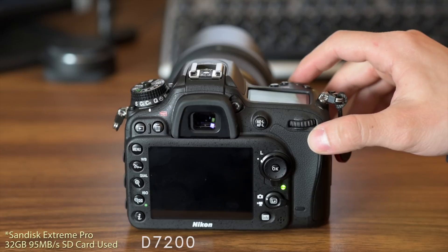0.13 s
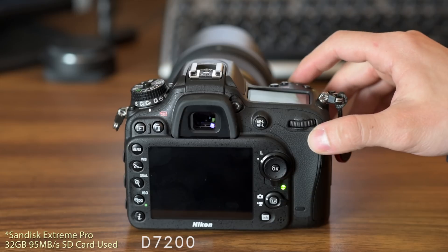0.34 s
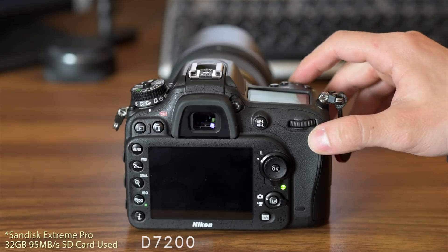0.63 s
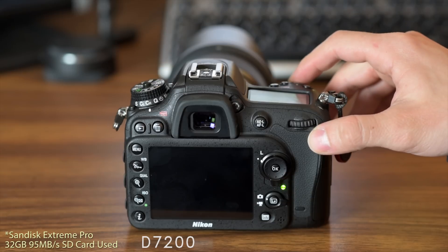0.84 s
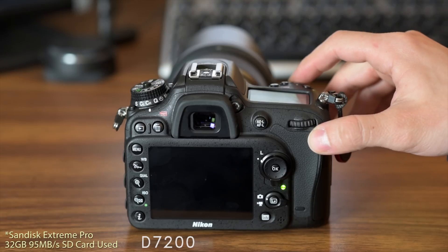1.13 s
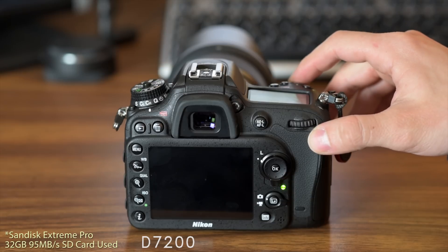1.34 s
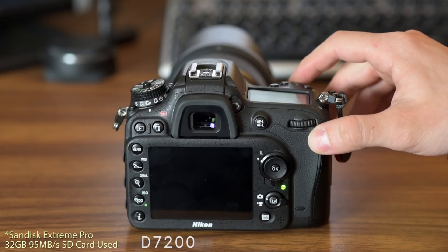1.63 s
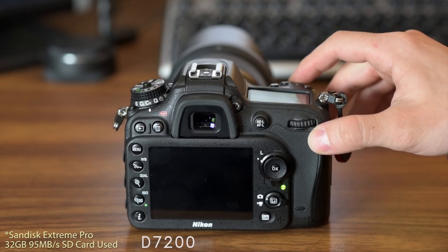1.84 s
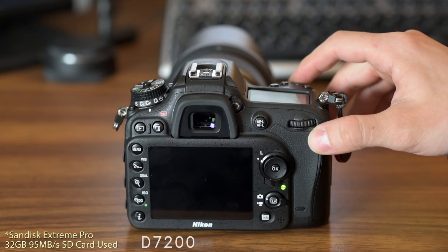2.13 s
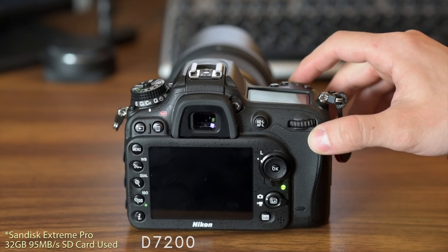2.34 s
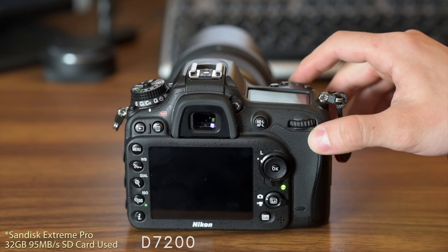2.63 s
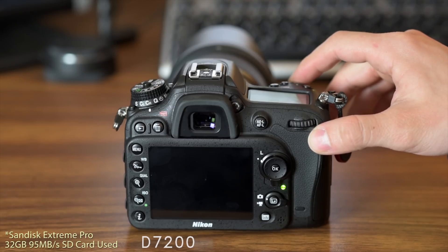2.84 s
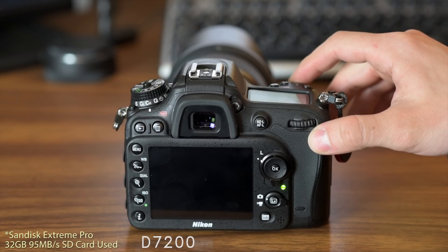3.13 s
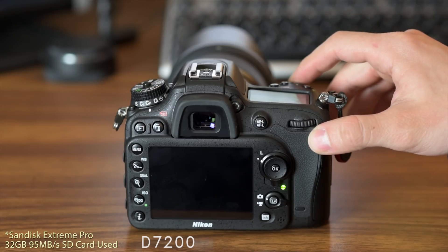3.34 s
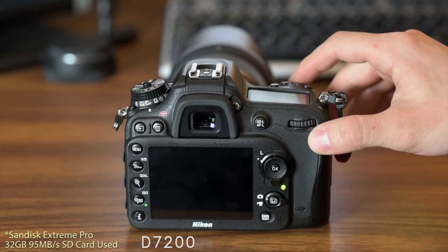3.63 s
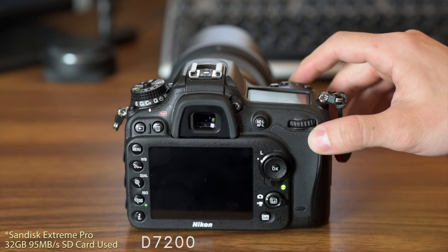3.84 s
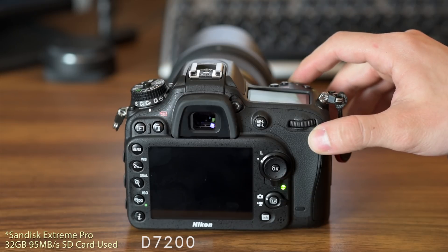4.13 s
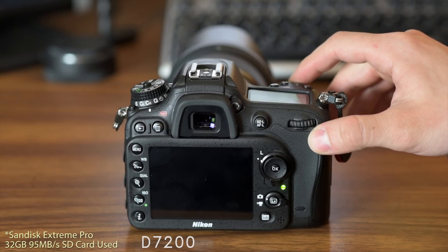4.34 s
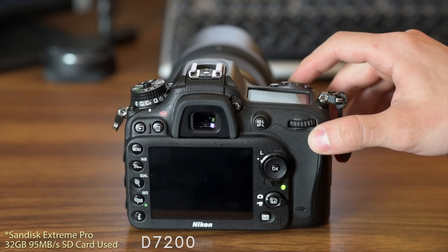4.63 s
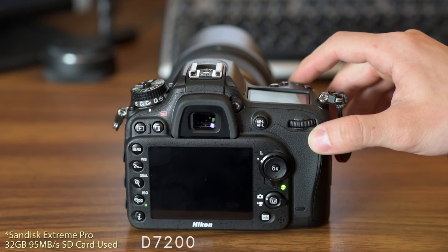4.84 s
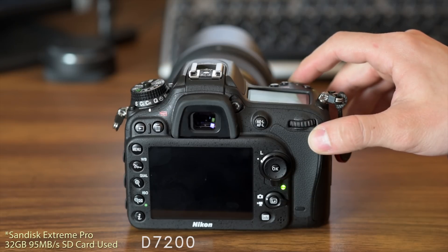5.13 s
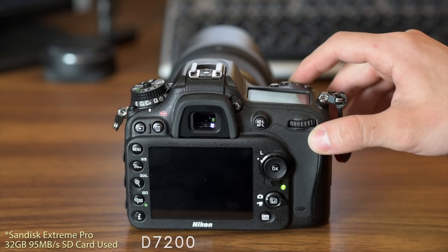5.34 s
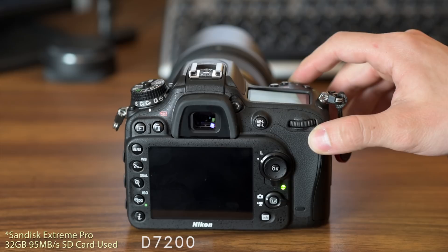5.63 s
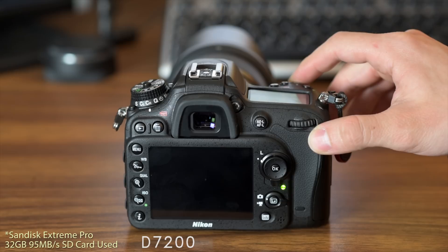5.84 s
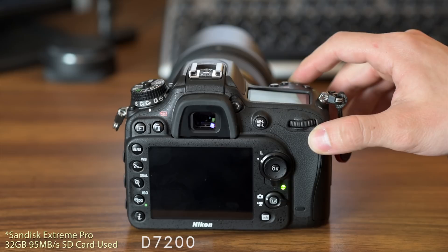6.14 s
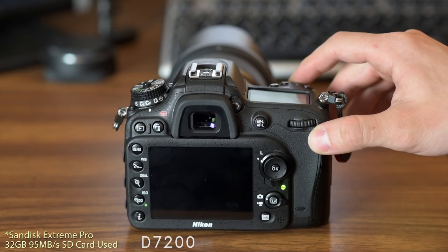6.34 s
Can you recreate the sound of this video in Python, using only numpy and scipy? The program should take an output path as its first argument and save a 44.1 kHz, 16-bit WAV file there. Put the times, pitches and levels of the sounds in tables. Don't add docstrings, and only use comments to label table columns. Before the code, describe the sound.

A quiet room with very faint low air and hiss, a close microphone, and a reflex camera standing on a wooden desk. From 0.03 s it fires a steady burst, one shot every 0.16 s, until about 4.4 s. Each shot lasts roughly a tenth of a second: a light latch tick, a mirror slap near 30 ms, a hard bright shutter clack near 50 ms, grainy gear winding, a strong mirror-return clack near 86 ms and a small catch click. Clack strength varies slightly from shot to shot. Plates ring briefly, the desk gives short dull thumps, and thin springs whine faintly. Then single shots come unevenly at about 4.75, 4.96, 5.26, 5.47, 5.68, 5.99, 6.29 and 6.45 s. After longer waits, a faint motor stir precedes the shot. The gaps hold fading spring whine and soft hiss; echo is short and weak.

```python
import sys
import numpy as np
from scipy import signal
from scipy.fft import rfft, irfft
from scipy.io import wavfile
from scipy.ndimage import uniform_filter1d

SR = 44100
rng = np.random.default_rng(int(sys.argv[2]) if len(sys.argv) > 2 else 0)


def bounce(signal):
    frames = np.transpose(np.atleast_2d(signal))
    limited = np.clip(frames, -1, 1)
    pcm = np.round(limited * 32767).astype(np.int16)
    wavfile.write(sys.argv[1], SR, pcm)


def invert_db(x):
    u = np.asarray(x, float) / 20
    return 10 ** u


N = 286650

# f/Hz, level/dB
AIR_COLOUR = [(40, -33.5), (80, -12.5), (130, 8), (250, 2), (500, -11.5), (1000, -19.5), (2500, -23.5),
              (5000, -32.5), (11000, -45), (13000, -64)]
# f/Hz, t60/s
ROOM_DECAY = [(300, 0.34), (1500, 0.19), (4000, .16), (12000, 0.15)]
# f/Hz, level/dB, t60/s, polarity
DESK_MODES = [(99.2, -7, 0.22, -0.99), (131.2, -14, 0.32, 1), (158, -4, 0.09, 0.95),
              (168.5, -14.5, 0.64, 0.61), (228.2, 0.5, 0.056, -0.9), (225.5, -24.5, 0.63, -1.25),
              (284.4, -4, 0.044, 0.96), (307, -22, 0.27, 0.99), (348.3, -25.5, 0.28, 0.56)]

# f/Hz, level/dB
LATCH_COLOUR = [(240, -47), (400, -27), (964, -6.5), (2400, -6), (3070, 4), (4950, -10), (7170, -1),
                (8240, -20.5), (9610, -11.5), (16000, -26)]
LEVER_COLOUR = [(240, -48), (400, -24.5), (839, -6), (1840, -7.5), (3070, 5), (3870, -6), (5270, -9),
                (6540, -13), (8900, -9.5), (9610, -10), (16000, -39)]
MIRROR_COLOUR = [(240, -42), (400, -8.5), (742, -16), (1380, -2), (2320, -12.5), (2900, -3), (4200, -10),
                 (5030, -6.5), (7060, -14.5), (8900, -14), (10700, -17), (16000, -30)]
CURTAIN_COLOUR = [(240, -13.5), (400, -10), (900, -9.5), (1400, 2), (2220, 0.5), (3160, -1), (5430, 0),
                  (6340, -6), (6950, -3), (7400, -12), (10500, -8.5), (16000, -25)]
RETURN_COLOUR = [(240, -47.5), (400, -19), (528, -16), (777, -11), (1200, -12.5), (2250, -3), (2510, -8),
                 (2970, 5.5), (3260, -5), (3530, -3), (10500, -16), (16000, -25)]
CATCH_COLOUR = [(240, -51), (400, -5), (579, -6.5), (1180, 8), (2180, 3), (2710, -5), (3260, 4.5),
                (4650, -13.5), (5780, -7), (16000, -35.5)]
GEAR_COLOUR = [(240, -29.5), (400, -10), (528, -12.5), (1600, -7.5), (1870, -2), (2430, -8), (3120, -0.5),
               (4880, -9), (6440, -9.5), (8500, -19), (13300, -26), (15300, -28), (16000, -57.5)]
WAKE_COLOUR = [(240, -48), (400, -33), (545, -7.5), (1250, -15), (1380, -4), (1760, -10), (3470, -3.5),
               (4730, -11), (8900, -18), (16000, -37)]

# t/ms into the frame, level/dB, direction
SWING_JOLTS = [
    (12.17, -35.5, 0.84),
    (23.18, -45, 0.82),
]
MIRROR_JOLTS = [
    (26.773, -29.5, 0.99),
    (33.39, -33.5, 0.74),
]
CURTAIN_JOLTS = [
    (47.34, -28, -1.15),
]
WIND_JOLTS = [
    (63.39, -33.5, 0.9),
    (72.66, -36, -0.92),
    (81.78, -33, -1.09),
    (88.2, -36, -0.65),
    (99.2, -44.5, 0.89),
]

# t/ms into the frame, f/Hz, peak level/dB, t60/ms
MIRROR_KNOCKS = [
    (29.02, 3410, -15, 8.7),
    (29.7, 3770, -18, 11.8),
    (29.4, 1310, -28, 31.5),
]
CURTAIN_KNOCKS = [
    (50.8, 1310, -22, 25.7),
    (51.37, 886, -36.5, 43),
    (51.4, 587, -43.5, 53),
]
RETURN_KNOCKS = [
    (86, 818, -28, 25.3),
    (86.8, 2210, -25.5, 30),
    (87.7, 1700, -34, 26),
    (100.63, 1030, -36, 25),
]

# t/ms at start, full, let go and stop, level/dB
WINDING = [
    (0, 2.5, 34.3, 59, -41),
    (30, 44, 45, 75, -41.5),
    (47, 62.2, 75.4, 98, -35),
    (75.5, 84, 93, 110, -42),
    (95, 94, 108, 120, -57.5),
]
WAKING = [
    (-47, -43.5, -28, -16, -52),
    (-30, -25, -15.5, 0, -59),
    (-8, -2, 3, 7, -55),
    (1, 0.5, 0, 7, -49),
]

# t/ms into the frame, peak level/dB, rise/ms, t60/ms, extra treble/dB
LATCH_BLOWS = [
    (-3, -47.5, 1, 74, -19),
    (0, -26.5, 0.41, 9.5, 2),
    (1.44, -27.5, 0.56, 12, -2.5),
]
LEVER_BLOWS = [
    (5.8, -29.5, 0.42, 18, 1),
    (6.6, -34.5, 0.23, 12, 11.5),
    (8.0, -29.5, 0.84, 16, -6.5),
    (10.3, -33, 0.4, 25, -7.5),
]
MIRROR_BLOWS = [
    (26.65, -31.5, 1, 21.6, 4.5),
    (29.08, -31, 0.34, 14, -1.5),
    (30.4, -28, 0.44, 23, -1.5),
]
CURTAIN_BLOWS = [
    (49.78, -20.5, .4, 9, 6.5),
    (51.66, -21.5, 0.42, 15.4, -2.5),
    (52.26, -21.5, 0.69, 12.6, -4.5),
]
CAM_BLOWS = [
    (44.3, -40.5, 0.56, 14, 3.5),
    (58.35, -37.5, 0.75, 18, 8.5),
    (71.1, -29.5, 0.95, 11, -1),
    (71.3, -34.5, .4, 26, 9),
    (83.5, -32.5, 0.91, 9.3, 7),
]
RETURN_BLOWS = [
    (84.3, -23.5, 0.2, 8.6, 7),
    (86.56, -22, 0.17, 15, -2),
    (88.5, -22, 0.84, 13.9, 5.5),
    (90.4, -27.5, 0.27, 25, -5.5),
]
CATCH_BLOWS = [
    (100.15, -33.5, 0.21, 39.6, 11.5),
    (103.8, -41, 1, 51, -8.5),
]

# t/s, mirror shift/ms, curtain level/dB, first spring level/dB
BURST = [(0.0296, -0.21, -7.5, -72), (0.1928, 0.37, -0.6, -63), (0.3562, -0.45, -9, -72),
         (0.5201, -0.42, -9, -74), (0.6832, -0.18, -7, -70), (0.8471, 0.051, -10, -79),
         (1.0104, 0.42, -0.2, -80), (1.1739, 0.54, -2.5, -82), (1.3373, 0.84, -9.5, -76),
         (1.501, 1, -0.3, -76), (1.6643, 0.79, -8, -75), (1.8276, 0.43, -10, -78),
         (1.9914, -0.75, -0.9, -82), (2.1551, -0.35, -9, -70), (2.3185, -0.25, -6.5, -81),
         (2.4817, -0.43, -0.6, -71.5), (2.6456, -0.36, -7.5, -81), (2.8088, -0.6, -4.5, -74),
         (2.9721, -0.22, -2, -77), (3.1359, -0.62, -7, -67), (3.2993, -0.51, -0.5, -71),
         (3.4635, -0.016, -10.5, -72), (3.627, 0.0044, -7.5, -75), (3.7902, 0.35, -0.5, -67.5),
         (3.9542, 0.1, -9, -67.5), (4.1177, 0.15, -0.5, -62.5), (4.281, 0.27, -8, -83)]
# t/s, mirror shift/ms, curtain level/dB, first spring level/dB, second spring level/dB
UNEVEN = [
    (4.4442, 0.07, -10, -68, -76),
    (4.7479, 0.1, -11, -65, -100),
    (4.9591, -0.67, -0.6, -79, -74),
    (5.263, -0.15, -9, -80, -77),
    (5.4726, -0.37, -8, -74, -76),
    (5.6832, -0.35, -0.9, -79, -70),
    (5.9876, -0.52, -9.5, -67, -70.5),
    (6.2908, 0.083, -14, -75, -79.5),
    (6.4505, 0.43, -3, -80, -72),
]
SHOTS = np.array([row[:4] for row in BURST + UNEVEN])
MIRROR_DB = 1.33


def read(points, hz):
    f, value = np.transpose(points)
    return np.interp(np.log(hz + 1), np.log(f + 1), value)


def colour(x, spectrum):
    hz = abs(np.fft.fftfreq(4096, 1 / SR))
    gain = np.log(invert_db(np.maximum(read(spectrum, hz), -90)))
    phase = -signal.hilbert(gain).imag
    taps = np.fft.ifft(np.exp(gain + 1j * phase)).real[:1024]
    return signal.oaconvolve(x, taps / np.linalg.norm(taps))[:len(x)]


def add(mix, s, sound):
    at = round(s * SR)
    sound = sound[max(-at, 0):]
    part = mix[max(at, 0):][:len(sound)]
    part += sound[:len(part)]


def background():
    return invert_db(-61) * colour(rng.standard_normal(N), AIR_COLOUR)


def room(x):
    taps = np.zeros(SR // 2)
    at = np.arange(200, SR // 2 - 20, 20)
    taps[at + rng.integers(0, 20, len(at))] = rng.choice([-1., 1.], len(at))
    hz, t, z = signal.stft(taps, SR, nperseg=256)
    decay = invert_db(-60 * t / read(ROOM_DECAY, hz)[:, None])
    tail = signal.istft(z * decay, SR, nperseg=256)[1]
    return signal.oaconvolve(x, tail / np.linalg.norm(tail))[:N]


def desk():
    lead_s = 0.5
    earlier = (SHOTS[0, 0] * 2 - SHOTS[1, 0], 0, 0, 0)
    s, shift_ms, curtain_db, _ = np.vstack([earlier, SHOTS]).T
    force = np.zeros(N + SR)
    sources = ((SWING_JOLTS + WIND_JOLTS, s, 0 * s),
               (CURTAIN_JOLTS, s, curtain_db),
               (MIRROR_JOLTS, s + shift_ms / 1000, MIRROR_DB + 0 * s))
    for jolts, starts, gains_db in sources:
        for at_ms, db, way in jolts:
            at = np.round((starts + lead_s + at_ms / 1000) * SR).astype(int)
            np.add.at(force, at, way * invert_db(db + gains_db))
    t = np.arange(SR // 2) / SR
    ring = np.zeros(len(t))
    for hz, db, t60, way in DESK_MODES:
        ring += way * invert_db(db - 60 * t / t60) * np.sin(2 * np.pi * hz * t)
    wood = signal.oaconvolve(force, ring)
    for _ in range(2):
        wood = signal.lfilter(*signal.butter(1, 150, "high", fs=SR), wood)
    return wood[SR // 2:][:N]


def springs():
    whine_hz, t60 = (2148, 2030, 1863), 0.33
    t, starts = np.arange(N) / SR, SHOTS[:, 0] + 0.1
    weak_db = (-80, -82.5) + 2 * rng.standard_normal((len(SHOTS), 2))
    weak_db[len(BURST):, 0] = [row[-1] for row in UNEVEN]
    whine_db = np.c_[SHOTS[:, -1], weak_db]
    frame = np.maximum(np.searchsorted(starts, t) - 1, 0)
    age = ((t - starts[frame]) % 1)[:, None]
    level = invert_db(whine_db[frame] - 60 * (age - 0.04) / t60) * np.minimum(age / 0.01, 1)
    level = uniform_filter1d(level, size=200, axis=0)
    return np.sqrt(2) * (level * np.sin(2 * np.pi * np.outer(t, whine_hz))).sum(1)


def rattle(strokes, spectrum, starts, teeth_per_s, spread_db):
    edge_db = -18
    ms = np.arange(-50, 120, 1000 / SR)
    power = np.zeros(len(ms))
    for *corners, db in strokes:
        swell_db = np.interp(ms, np.sort(corners), [edge_db, 0, 0, edge_db], -99, -99)
        power += invert_db(db + swell_db) ** 2
    level = np.zeros(N)
    for s in starts:
        add(level, s + ms[0] / 1000, np.sqrt(power))
    is_tooth = rng.random(N) < teeth_per_s / SR
    size_db = np.minimum(rng.exponential(1, N), 4) * spread_db
    teeth = is_tooth * invert_db(size_db) * rng.standard_normal(N)
    return colour(level * teeth / np.std(teeth), spectrum)


def knocks(plates, starts, gains_db):
    ms, out = np.arange(2500) / SR * 1000, np.zeros(N)
    for at_ms, hz, db, t60_ms in plates:
        swell = np.sin(np.pi / 2 * np.minimum(ms / 1.3, 1)) ** 2
        shape = invert_db(db - 60 * ms / t60_ms) * swell
        drifts = rng.normal(1, 0.018, len(starts))
        for s, gain_db, drift in zip(starts, gains_db, drifts):
            tone = np.sin(2 * np.pi * hz * drift * ms / 1000)
            add(out, s + at_ms / 1000, invert_db(gain_db) * shape * tone)
    return out


def strikes(blows, spectrum, starts, gains_db, alike):
    tick = 2.88
    ms, body, treble = np.arange(2000) / SR * 1000, np.zeros(N), np.zeros(N)
    for at_ms, db, rise_ms, t60_ms, treble_db in blows:
        shape = invert_db(db - 60 * ms / t60_ms) * np.minimum(ms / rise_ms, 1)
        habit = rfft(rng.standard_normal(len(ms)) * shape)
        even = np.sqrt(uniform_filter1d(abs(habit) ** 2, size=11))
        habit = irfft(habit / even) * np.linalg.norm(shape) * (ms < 30)
        habit[round(rise_ms * SR / 1000)] += tick * shape.max()
        fresh = rng.standard_normal((len(starts), len(ms))) * shape
        for s, gain_db, chance in zip(starts, gains_db, fresh):
            blow = invert_db(gain_db) * (alike * habit + np.sqrt(1 - alike ** 2) * chance)
            add(body, s + at_ms / 1000, blow)
            add(treble, s + at_ms / 1000, blow * invert_db(treble_db - 2.83 * ms))
    low = signal.butter(2, 6500, "low", fs=SR, output="sos")
    high = signal.butter(2, 6500, "high", fs=SR, output="sos")
    return colour(signal.sosfilt(low, body) - signal.sosfilt(high, treble), spectrum)


def camera():
    loose, firm = 0.75, 0.9
    s, shift_ms, curtain_db, _ = SHOTS.T
    woken = np.diff(s, prepend=0) > 0.25
    luck = rng.standard_normal((len(s), 2))
    mirror_db = MIRROR_DB + 0.5 * luck[:, 0]
    return_db = -2.13 - 0.27 * luck[:, 1]
    trip = s + woken * 3.6 / 1000
    slap, even = s + shift_ms / 1000, 0 * s
    return (strikes(LATCH_BLOWS, LATCH_COLOUR, trip, -3 * woken, loose)
            + strikes(LEVER_BLOWS, LEVER_COLOUR, trip, -3 * woken, loose)
            + strikes(MIRROR_BLOWS, MIRROR_COLOUR, slap, mirror_db, firm)
            + strikes(CURTAIN_BLOWS, CURTAIN_COLOUR, s, 1.1 * curtain_db, firm)
            + strikes(CAM_BLOWS, GEAR_COLOUR, s, even, loose)
            + strikes(RETURN_BLOWS, RETURN_COLOUR, s, return_db, firm)
            + strikes(CATCH_BLOWS, CATCH_COLOUR, s, even, firm)
            + knocks(MIRROR_KNOCKS, slap, mirror_db)
            + knocks(CURTAIN_KNOCKS, s, 0.75 * curtain_db)
            + knocks(RETURN_KNOCKS, s, return_db)
            + rattle(WINDING, GEAR_COLOUR, s, 6000, 2.5)
            + rattle(WAKING, WAKE_COLOUR, s[woken], 12000, 1.4))


def scene():
    body = signal.sosfilt(signal.butter(2, 430, "high", fs=SR, output="sos"), camera())
    heard = body + invert_db(-19.5) * room(body) + springs()
    frame = round((SHOTS[1, 0] - SHOTS[0, 0]) * SR)
    quiet = round(SHOTS[0, 0] * 0.85 * SR)
    fade = np.hanning(2 * quiet)[quiet:] ** 0.25
    add(heard, 0, heard[frame:frame + quiet] * fade)
    return (heard + desk() + background())[None]


def band_limit(x):
    return signal.sosfilt(signal.butter(12, 16800, fs=SR, output="sos"), x)


def record(dry):
    x = signal.sosfilt(signal.butter(3, 60, "high", fs=SR, output="sos"), dry)
    lowpass = signal.firwin(601, 16100, window=("kaiser", 9), fs=SR)
    x = signal.oaconvolve(x, lowpass[None], "same")
    return band_limit(x)


dry = scene()
out = record(dry)
bounce(out)
```